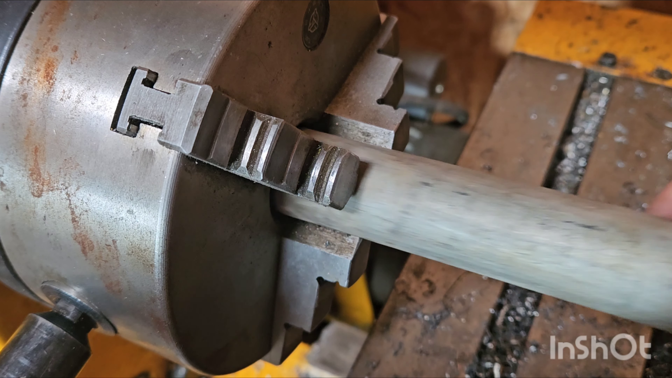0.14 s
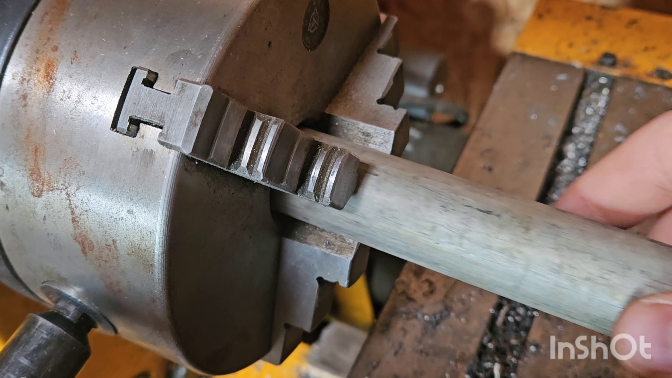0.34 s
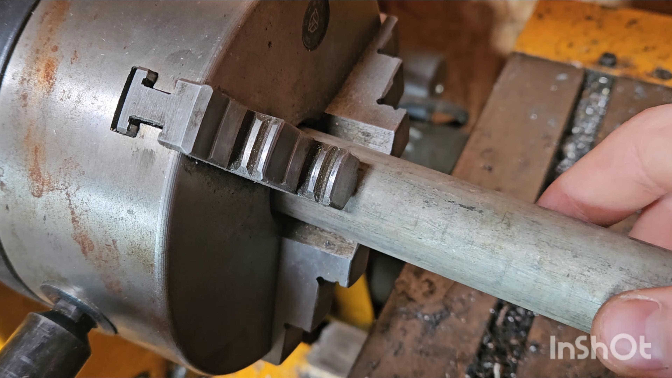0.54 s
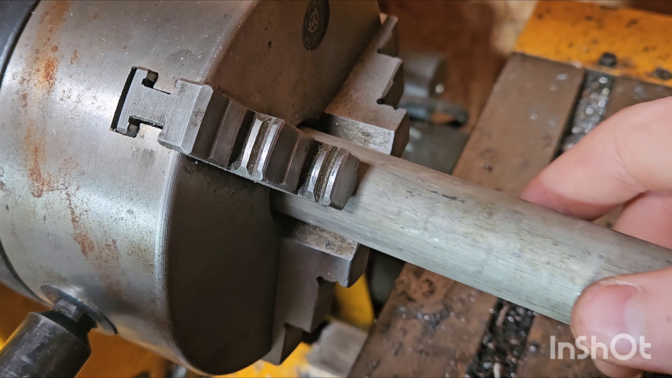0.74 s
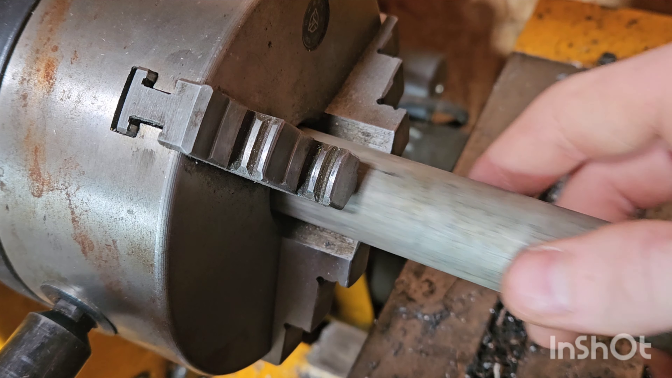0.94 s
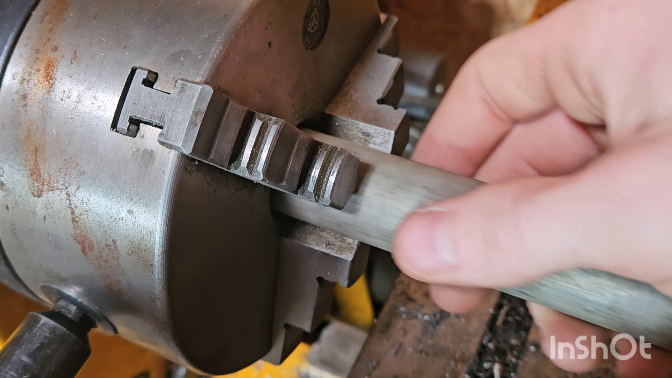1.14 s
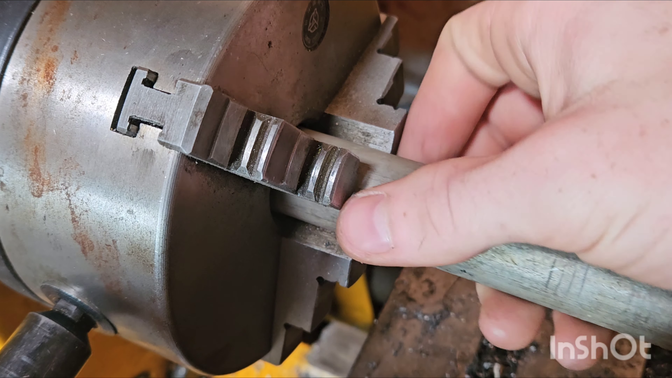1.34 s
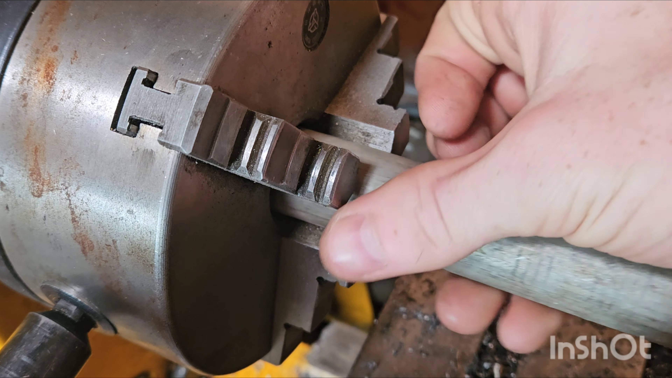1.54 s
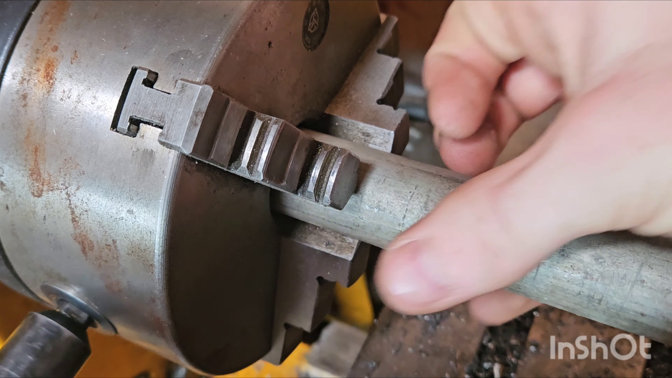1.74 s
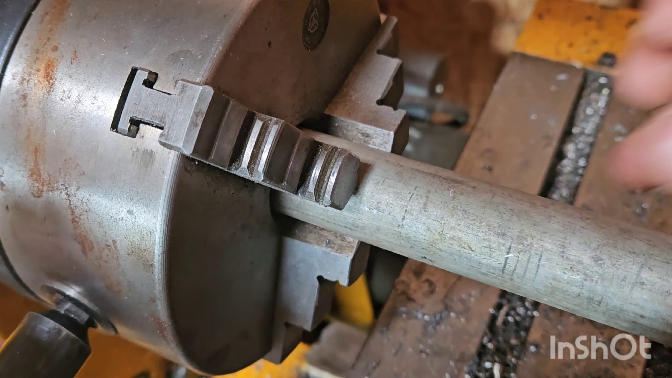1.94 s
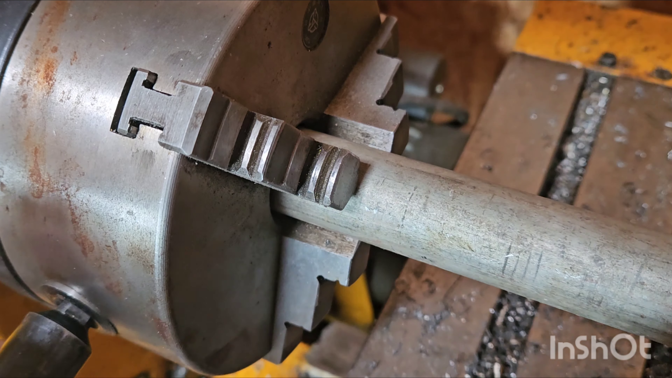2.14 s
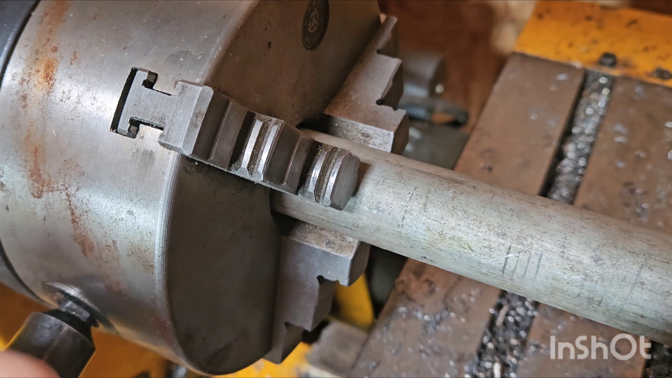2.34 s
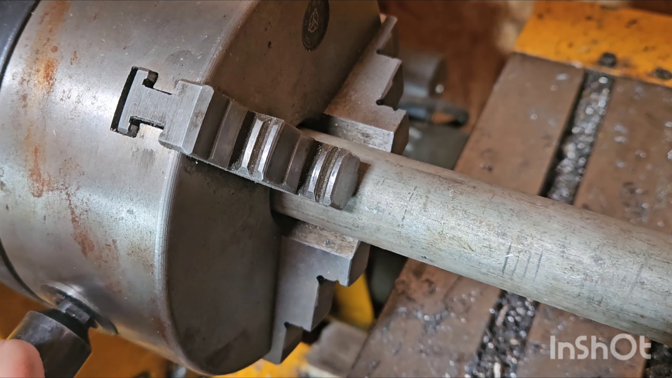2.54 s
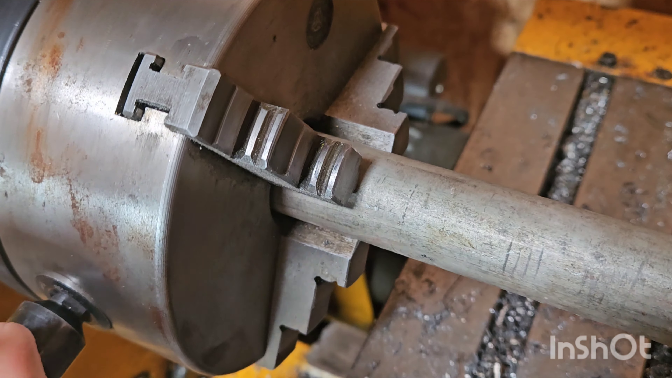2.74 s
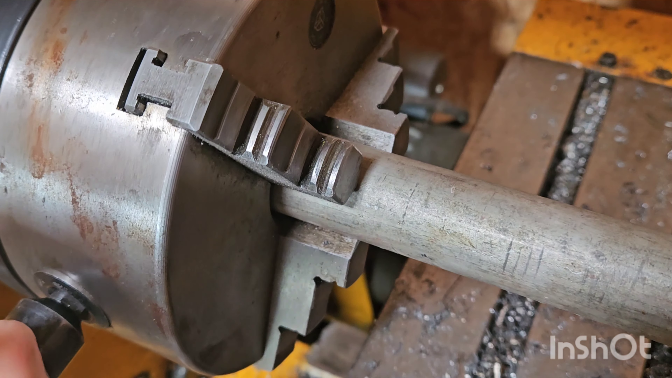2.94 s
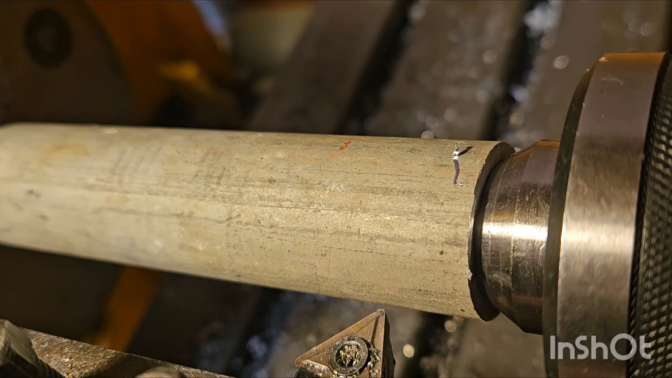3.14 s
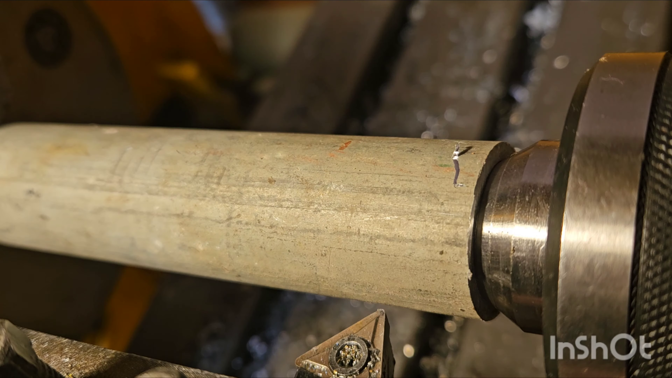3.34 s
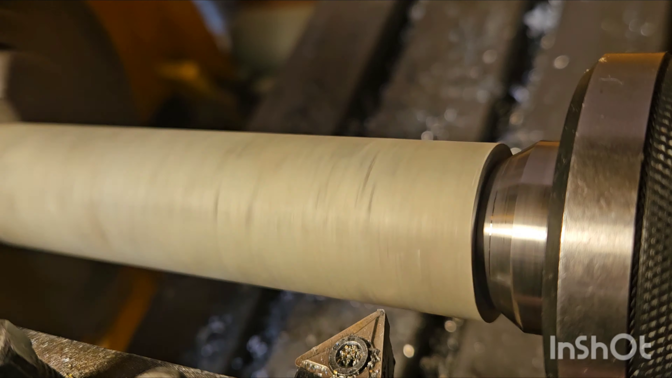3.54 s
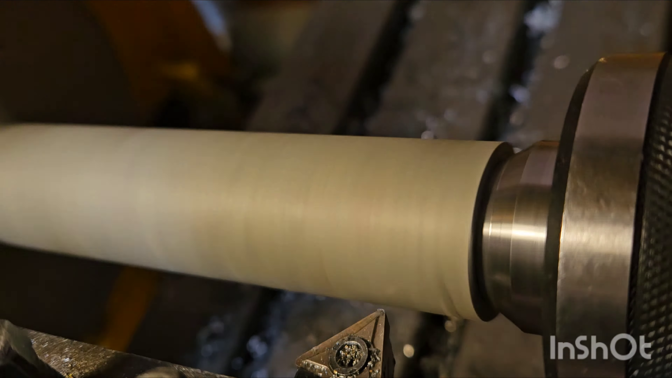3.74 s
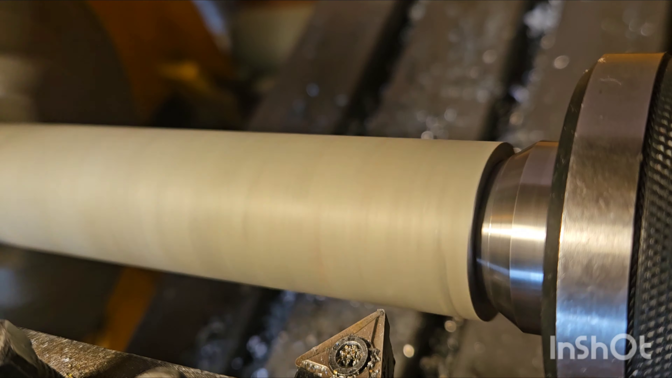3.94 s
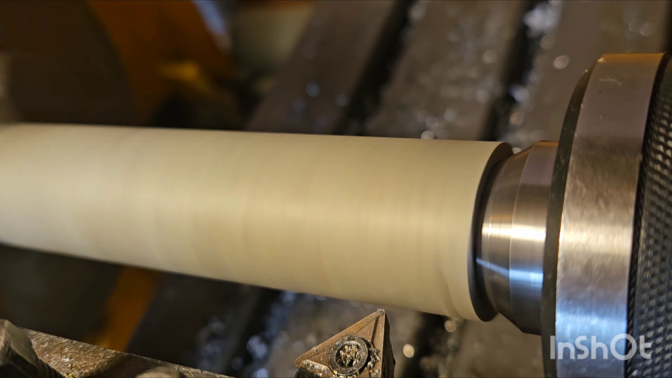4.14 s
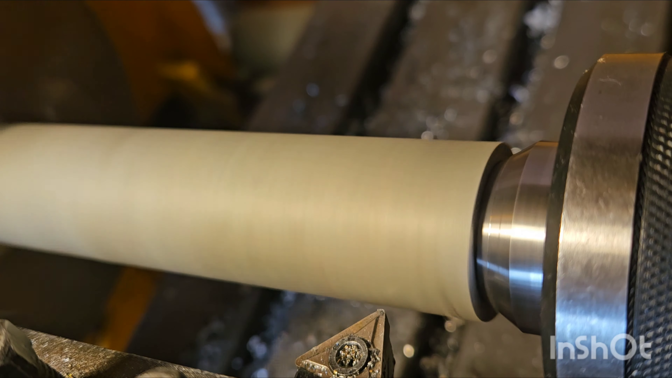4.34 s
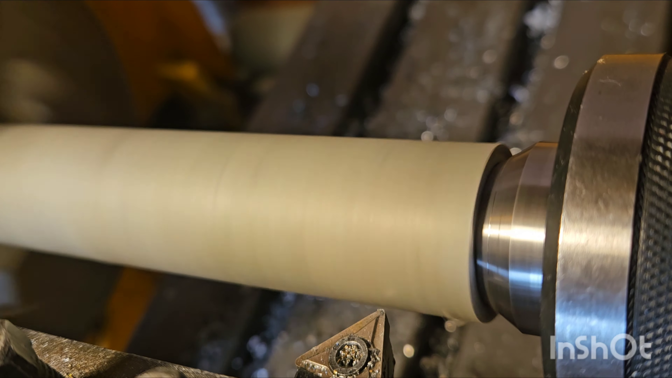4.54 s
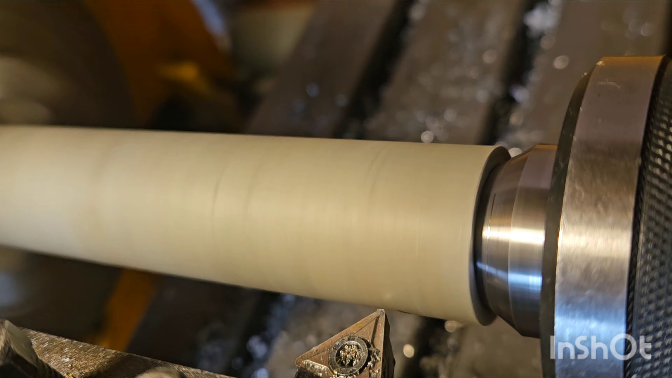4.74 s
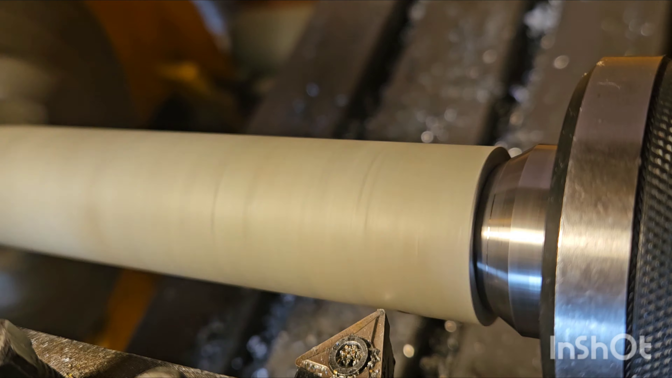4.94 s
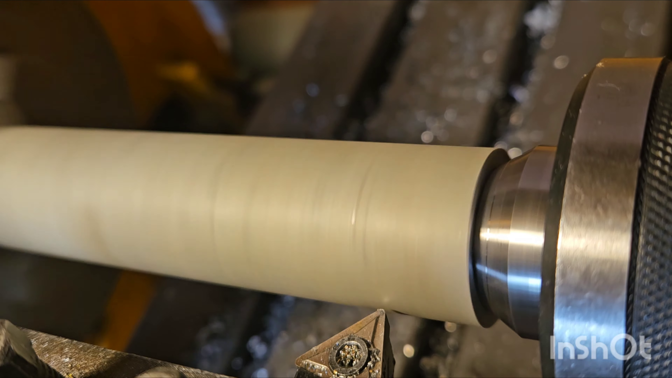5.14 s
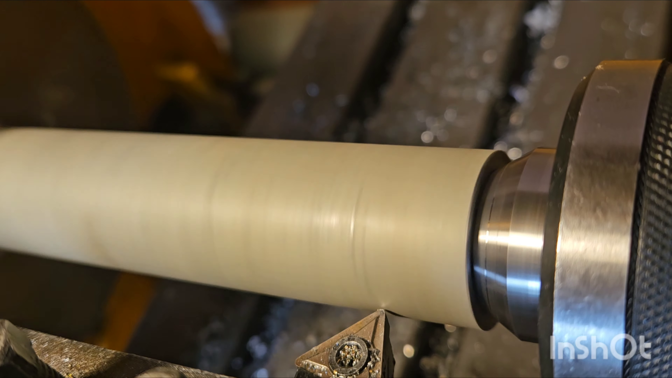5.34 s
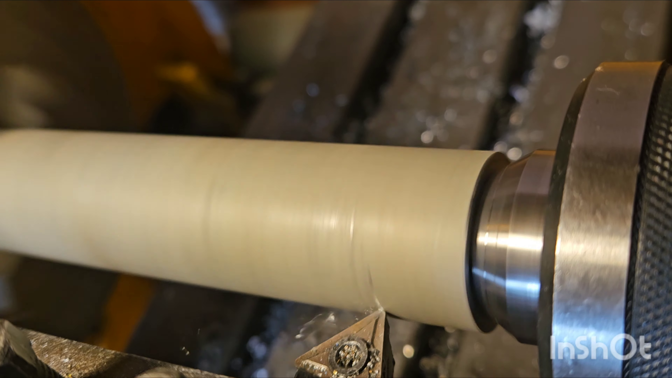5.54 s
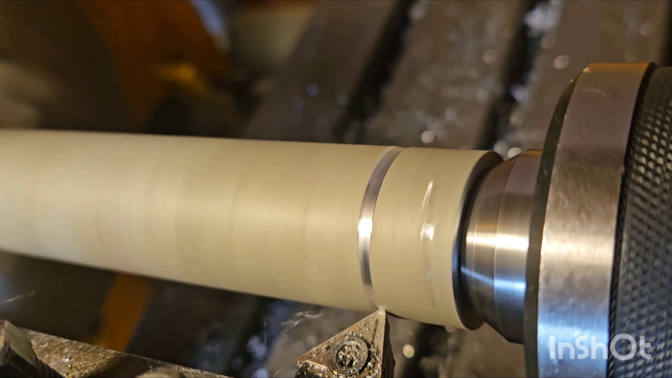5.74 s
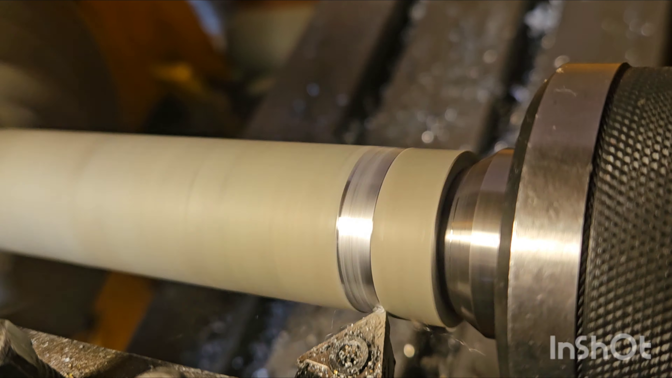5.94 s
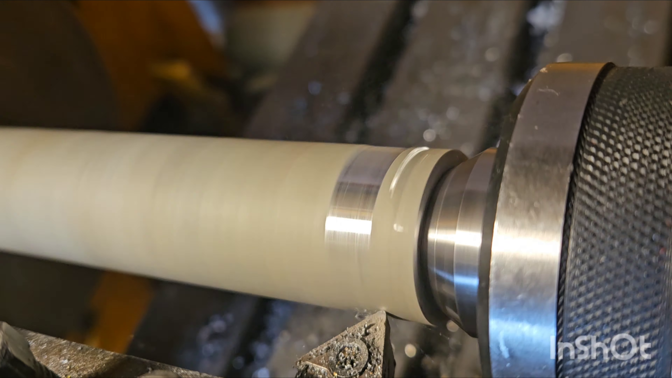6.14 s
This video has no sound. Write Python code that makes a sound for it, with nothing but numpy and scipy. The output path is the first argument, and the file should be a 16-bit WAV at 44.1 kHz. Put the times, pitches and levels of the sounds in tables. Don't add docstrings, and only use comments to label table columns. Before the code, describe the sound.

Metal rod slides and squeals faintly into a lathe chuck, knocks and key clicks follow, then a cut to a loud rattling lathe starting up and cutting.

```python
import sys
import numpy as np
from scipy import signal
from scipy.fft import rfft, irfft, next_fast_len
from scipy.io import wavfile
from scipy.ndimage import uniform_filter1d

SR = 44100
rng = np.random.default_rng(int(sys.argv[2]) if len(sys.argv) > 2 else 0)


def file_out(sig):
    cols = np.atleast_2d(sig).T
    lim = np.clip(cols, -1, 1)
    pcm = np.round(lim * 32767).astype(np.int16)
    wavfile.write(sys.argv[1], SR, pcm)


def boost(x):
    u = np.asarray(x, float) / 20
    return 10 ** u


N = 272097
M = next_fast_len(N + SR)
F = np.arange(M // 2 + 1) * SR / M + 1e-3
T = np.arange(N) / SR
PORT = np.array([[1], [-1]])
CUT_S = 3.1484
# drop/s, fade starts/s, fade ends/s
GAP_S = (5.5884, 5.602, 5.614)
# t/s, hold/s, level/dB, lean to the first mode/dB
SQUEALS = [(0, 0.23, -71, 11), (0.233, 0.021, -59.5, -4.5), (0.287, 0.0053, -62, 15.5),
           (0.3, 0.13, -75.5, 3), (.6, 0.14, -83, 4.5), (0.792, 0.17, -71.5, 8), (0.911, 0.14, -66.5, 2),
           (1.086, 0.13, -65, 11.5), (1.247, 0.057, -71.5, 8), (1.383, 0.011, -68, 9),
           (1.517, 0.064, -72, 7.5)]


def along(points, f=F):
    hz, value = np.transpose(points)
    return np.interp(np.log(f), np.log(hz), value)


def modes(table):
    return sum((-1) ** k * boost(db + PORT * pan_db / 2) * 1j * F * w / (hz ** 2 - F ** 2 + 1j * F * w)
               for k, (hz, w, db, pan_db) in enumerate(table))


def band(lo_hz, hi_hz):
    return 1 / np.sqrt((1 + (lo_hz / F) ** 8) * (1 + (F / hi_hz) ** 8))


def walk(rate):
    k = int(SR / rate)
    return uniform_filter1d(np.repeat(rng.standard_normal(N // k + 1), k), k)[:N]


def curve(s, db):
    return boost(np.interp(T, s, db, left=-200, right=-200))


def strokes(table, rise_s, fall_s):
    power = 0
    for s, hold, db in table:
        outside = np.maximum((s - T) / rise_s, (T - s - hold) / fall_s)
        power = power + boost(2 * db - 80 * np.clip(outside, 0, 5))
    return np.sqrt(power)


def tones(table, swell_db):
    rows = []
    for hz, wander, db in table:
        size = boost(db + 4.0 + swell_db * walk(wander))
        pitch = hz + 0.401 * wander * walk(3 * wander)
        rows.append(size * np.sin(2 * np.pi * np.cumsum(pitch) / SR))
    return np.array(rows)


def placed(table, swell_db):
    rows = np.array(table, float)
    tone = tones(rows[:, :3], swell_db)
    lag = rng.integers(0, 9, len(rows))
    return np.array([boost(PORT * pan / 2) * [x, np.roll(x, k)] for x, k, pan in zip(tone, lag, rows[:, 3])])


def echoes(t60_s):
    path = rng.standard_normal(SR // 2) * np.exp(-T[:SR // 2] * np.log(1000) / t60_s)
    return rfft(path / np.sqrt(np.sum(path ** 2)), M)


def excite(gain, body, lo_hz, hi_hz, grain_db=0., t60_s=0.19):
    # f/Hz, likeness/-1..1
    likeness = [(60, 0.97), (130, 0.93), (290, 0.85), (640, 0.53), (1400, .05), (3000, 0.087)]
    grain = boost(grain_db * np.minimum(rng.exponential(size=N), 5))
    near, far = rng.standard_normal((2, N)) * grain
    alike = np.clip(along(likeness), -1, 1)
    to_mid, to_side = 1 + .3 * echoes(t60_s), .7 * echoes(t60_s)
    top_hz = 15780

    def ports(g):
        source = rfft(near * g, M)
        side = to_side * source + 0.82 * rfft(far * g, M)
        pair = np.sqrt(1 + alike) * to_mid * source + PORT * np.sqrt(1 - alike) * side
        return body * (F < top_hz) * pair

    power = np.abs(ports(1).mean(axis=0)[(F > lo_hz) & (F < hi_hz)]) ** 2
    return irfft(ports(gain), M)[:, :N] / np.sqrt(2 * power.sum() / M / N)


def knocks(table, top_db, tail_db, crack_s=0.0034, tail_s=0.25, ring_db=9, pan_db=3):
    out, t = np.zeros((2, N + SR)), np.arange(SR // 3) / SR
    f = np.arange(len(t) // 2 + 1) * SR / len(t) + 1e-3
    lead = SR // 200
    for s, db, hz, body_db, edge_db in table:
        both, left, right, *tail = rng.standard_normal((5, len(t))) * np.minimum(t / 0.000097, 1)
        crack = rfft((both + 2.35 * np.array([left, right])) * np.exp(-t / crack_s))
        crack = crack * (1 + boost(ring_db) * 1j * f * 0.073 * hz / (hz ** 2 - f ** 2 + 1j * f * 0.095 * hz))
        tail = rfft(np.array(tail) * boost(tail_db) * np.exp(-t * np.log(1000) / tail_s)) / (1 + (f / 7000) ** 2)
        colour = boost(along([(300, body_db - 13.0), (1100, body_db + 10.0), (2300, 0.0031), (4500, 0.011),
                            (6500, edge_db), (9000, edge_db), (10500, top_db + 2.5),
                            (16000, top_db + 4.5), (16600, top_db - 46)], f))
        core = irfft(crack * (f > 2000) * (f < 5500), len(t))
        hit = np.roll(irfft((crack + tail) * colour, len(t)), lead, axis=1)
        i = int(s * SR)
        out[:, i - lead:i - lead + len(t)] += hit * boost(db + PORT * pan_db / 2) / np.abs(core.mean(axis=0)).max()
    return out[:, :N]


def shop_air():
    # f/Hz, level/dB per Hz
    murmur = [(88, -37), (150, 8.5), (189, -30), (225, -2), (481, -23.5), (1060, -18.5), (1220, -25.5),
              (1370, -24), (2760, -45.5), (8490, -48), (15500, -58)]
    return excite(boost(-67.5 + 1.3 * walk(3.5)), boost(along(murmur)), 284, 2000)


def still_air():
    # f/Hz, level/dB per Hz
    room = [(15, -36), (25, 5.5), (55, 5.5), (146, -6), (197, -18), (237, -13.5), (392, -25.5),
            (980, -21.5), (1150, -29.5), (6000, -58), (7800, -92), (13200, -120)]
    return excite(boost(-56 + 1.7 * walk(10)), boost(along(room)), 25, 2000)


def slow_machine():
    # t/s, rate/turns per s
    turn_rate = [(0, 11.7), (.3, 11.65), (.55, 11.95), (1.4, 11.95), (1.7, 12.05), (2.7, 12.1), (3.15, 12)]
    # multiple of the turn, level/dB
    multiples = [(6, -8), (7, -7), (8, -4), (10, -10), (11, -4), (12, -18), (13, -20), (14, -18), (15, -28)]
    turns = 2 * np.pi * np.cumsum(np.interp(T, *np.transpose(turn_rate))) / SR
    idler = 0
    for k, db in multiples:
        size = boost(-0.4 + db + 3 + 2.0 * walk(5))
        idler = idler + size * np.sin(k * turns + 7 * rng.random())
    throb = boost(2.0 + 0.6 * walk(3)) * np.sin(5 * turns)
    return throb, idler


def floor_hum():
    # f/Hz, width/Hz, level/dB, left minus right/dB
    floor = [(38.4, 24, -4.5, -5), (62, 36, -4.5, -1), (90.3, 30, -5, -8), (131.7, 27, -13.5, 1),
             (163, 18, -20.5, -6)]
    # t/s, level/dB
    swell = [
        (0, -40),
        (.2, -36),
        (.54, -42),
        (1.2, -36),
        (1.45, -35),
        (1.96, -45),
        (2.4, -40),
        (2.6, -44.5),
        (2.85, -52.5),
        (3.17, -53.5),
    ]
    # t/s, hold/s, level/dB
    lean_on_key = [
        (3.11, .06, -58),
    ]
    throb, idler = slow_machine()
    body = modes(floor).mean(axis=0) * band(25, 215)
    rumble = boost(-6.5) * excite(0.96, body, 90, 177, t60_s=0.009) + idler
    heave = boost(-42 - 2.5 * T + 0.9 * walk(7.1)) + strokes(lean_on_key, 0.36, .1)
    return heave * rumble + curve(*np.transpose(swell)) * throb


def far_motor():
    # t/s, f/Hz, level/dB
    spin_up = [
        (2.6, 52, -55),
        (2.68, 58, -41),
        (2.76, 63, -52),
        (2.9, 65, -48),
        (2.96, 66.5, -36),
        (3.03, 71, -42),
        (3.08, 73, -38),
        (3.15, 77, -34),
    ]
    s, hz, db = np.transpose(spin_up)
    phase = 2 * np.pi * np.cumsum(np.interp(T, s, hz)) / SR
    return -np.sqrt(2) * curve(s, db) * np.cos(phase - phase[int(CUT_S * SR)])


def hand():
    # t/s, hold/s, level/dB
    brushes = [
        (.23, 0.11, -85),
        (.448, .004, -82),
        (.8, 0.35, -97),
        (1.06, 0.2, -77),
        (1.345, 0.043, -70),
        (1.5, 0.24, -84),
        (2.27, 0.028, -63.5),
        (2.32, 0.097, -74.5),
        (2.52, .02, -71),
        (2.955, 0.11, -73),
    ]
    # f/Hz, level/dB per Hz
    rustle = [(3000, -14), (5500, -4.5), (8500, 3), (10000, -1), (12000, 3), (16000, 6)]
    return excite(strokes(brushes, 0.055, 0.1), boost(along(rustle)), 7460, 14200, grain_db=5.5, t60_s=0.044)


def squeal_gain(lean, rise_s, fall_s):
    return strokes([(s, hold, db + lean * d) for s, hold, db, d in SQUEALS], rise_s, fall_s)


def sliding_rod():
    # t/s, push/dB
    shoves = [
        [(0, -46.5), (.31, -47.5), (.54, -64), (.59, -66)],
        [(.61, -60.5), (.86, -51.5), (1.2, -43.5), (1.36, -52), (1.41, -47.5), (1.51, -57), (1.62, -47),
         (1.66, -58)],
        [(1.8, -54.5), (1.96, -60), (2.08, -80)],
    ]
    # t/s, hold/s, level/dB
    thuds = [
        (2.245, 0.011, -38),
        (2.47, .03, -48.5),
        (2.515, 0.012, -42),
        (2.96, .02, -57.5),
        (3.03, 0.021, -54),
    ]
    # f/Hz, width/Hz, level/dB, left minus right/dB
    hollow = [(250.5, 6.1, -2, -1), (333, 39, -1.5, 0.94), (375, 61, -3, -0.84), (410, 18.8, 2.5, 1),
              (467, 35, -7.5, 0)]
    # f/Hz, level/dB per Hz
    scrape_colour = [(290, -22), (500, 3), (1930, -13), (2460, -13), (2730, -18), (5310, -32), (6140, -21),
                     (7640, -69), (10400, -28), (16000, -25)]
    # f/Hz, width/Hz, level/dB, left minus right/dB
    rod_low = [(2490, 60, 3, 3.1), (2900, 500, -13, 4.5), (4100, 200, -19, 0), (4900, 300, -19, -1)]
    rod_mid = [(6140, 35, 0, 3.5)]
    rod_top = [(8610, 200, -18, 1), (10700, 40, 0, 2), (12520, 45, -1, 0), (13900, 70, -9, 0),
               (15400, 100, -13, 0)]
    slip = boost(3.0 * walk(35))
    push, jaws = curve(*np.vstack(shoves).T), strokes(thuds, .03, .27)
    thud_body = band(243, 400) ** 2 + boost(-29.0) * band(460, 1796)
    thud = excite(jaws, thud_body, 200, 560, t60_s=0.033)
    boom = excite(push * boost(2.0 * walk(29.4)), modes(hollow) * band(217, 660), 220, 520, t60_s=0.043)
    rest = boost(-64.5)
    rub = boost(-80.5) * ((push + jaws + rest) / boost(-48)) ** 0.78
    scrape_body = boost(along(scrape_colour)) * band(400, 7600)
    scrape = excite(rub * np.sqrt(slip), scrape_body, 2850, 7200, grain_db=2.0)
    low, mid, top = [squeal_gain(lean, 0.02, 0.073) for lean in (1, -0.49, 0)]
    rod = boost(-4.0) * excite(low * np.sqrt(slip), modes(rod_low) * band(1300, 4400), 2380, 2680)
    rod += boost(-3.5) * excite(mid * slip, modes(rod_mid) * band(4800, 5800) * boost(-6.0), 6146.4, 6206)
    rod += excite(top * boost(-9.5) * slip, modes(rod_top) * band(12000, 17000), 10550, 10850)
    return thud + boom + scrape + rod


def rod_partials():
    # f/Hz, wander/Hz, level/dB, left minus right/dB
    partials = [(2450, 24, -7.5, -3), (3350, 33, -18, 9), (6140, 50, -9.5, 3), (10660, 52, -13, -9),
                (12550, 70, -11, -8), (14200, 80, -10, -2)]
    leans = [0.71, 0.021, -1.3, -0.36, 0.17, 0]
    return sum(x * squeal_gain(lean, 0.08, 0.14) for x, lean in zip(placed(partials, swell_db=6.5), leans))


def key():
    # t/s, hold/s, level/dB
    grind = [
        (1.64, .05, -78),
        (1.77, 0.055, -71),
        (1.87, .03, -74),
        (1.92, 0.028, -71),
        (1.99, 0.018, -81),
    ]
    # t/s, level/dB
    squeak = [
        (2.6, -105),
        (2.9, -94),
        (2.99, -90),
        (3.01, -79),
        (3.15, -83),
    ]
    # t/s, hold/s, level/dB, f/Hz
    pings = [(.093, .012, -62, 3100), (.094, .01, -63, 4200), (.151, .012, -63, 3100),
             (.194, .012, -64, 3050), (1.27, .05, -82, 3350), (1.69, .045, -80, 6150),
             (2.02, .06, -87, 3320), (2.232, .03, -70, 5100), (2.452, .01, -75, 3600),
             (2.475, .04, -64, 1550), (2.575, .03, -89, 6300), (2.58, .015, -74, 2300),
             (2.61, .02, -81, 2950), (2.66, .04, -87, 2950), (2.68, .05, -92, 5650),
             (2.95, .008, -82, 3800), (3.025, .008, -86, 4400)]
    # t/s, peak/dB, ring/Hz, body/dB, edge/dB
    fumbles = [(.141, -55, 3100, -10, -35), (.16, -55, 3100, -10, -35), (1.433, -70, 2500, -7, -30),
               (1.708, -68, 2000, -4, -30), (1.81, -62, 3100, -10, -30), (1.943, -59.5, 3000, 5, -25),
               (2.398, -58, 5200, -10, -8), (2.579, -63, 2280, 6, -30), (2.6353, -63, 3100, -8, -30),
               (2.6678, -68, 1540, 13, -30), (3.027, -68, 1100, 8, -30)]
    out = excite(strokes(grind, .03, 0.1), band(1200, 5400), 1200, 5600, grain_db=3.5, t60_s=0.06)
    out += curve(*np.transpose(squeak)) * np.sin(2 * np.pi * 3335 * T + 0.99 * walk(40))
    rings = placed([(hz, 90, db, 0) for s, hold, db, hz in pings], swell_db=4)
    for x, (s, hold, db, hz) in zip(rings, pings):
        out += x * strokes([(s, hold, 0)], 0.013, 0.033)
    return out + knocks(fumbles, top_db=-30, tail_db=-6)


def taps():
    # t/s, peak/dB, ring/Hz, body/dB, edge/dB
    dull = [(.0927, -42.5, 4250, -10, -35), (.1274, -48, 2520, -7, -30), (.1504, -43.5, 3080, -6, -38),
            (.1935, -44, 3050, -8, -33), (.2839, -40.5, 2850, 8.5, -50), (.448, -56, 2280, 8, -30),
            (1.3892, -59, 2550, -4, -30), (1.6225, -31, 4900, -12, -6.5), (1.7595, -47.5, 3190, -3, -25),
            (1.7875, -45, 3040, 3, -12), (1.8397, -48.5, 3920, 1, -22), (1.8706, -50.5, 3160, 3, -27),
            (1.9157, -44, 3550, -5, -13), (1.9859, -49, 3220, -17, -11), (2.2292, -42, 3140, -7, -8.5),
            (2.2712, -35, 3270, -15, -9), (2.356, -49, 3300, -25, 5), (2.4688, -31, 3660, -9.5, -6),
            (2.9282, -56, 3080, -3, -36)]
    # t/s, peak/dB, ring/Hz, body/dB, edge/dB
    snaps = [
        (2.3007, -28.5, 5200, -26.5, -0.42),
        (2.5145, -38, 4530, 2, 0.1),
    ]
    return knocks(dull, top_db=-30, tail_db=-6.5) + knocks(snaps, top_db=-1.5, tail_db=-12)


def chucking():
    return shop_air() + floor_hum() + far_motor() + hand() + sliding_rod() + rod_partials() + key() + taps()


def start_up(engage_s):
    # t/s, level/dB
    moan = [
        (3.385, -78),
        (3.4, -45),
        (3.47, -38.5),
        (3.6, -38),
        (3.65, -38),
        (3.75, -34),
        (3.8, -64),
        (3.9, -73),
    ]
    # f/Hz, width/Hz, level/dB, left minus right/dB
    winding_modes = [(507, 67, 18, 0), (158, 15, 5, 0)]
    # f/Hz, wander/Hz, level/dB
    core = (515, 14, -3)
    # t/s, level/dB
    squeal = [
        (3.69, -60),
        (3.703, -31),
        (3.716, -20),
        (3.728, -84),
    ]
    # t/s, peak/dB, ring/Hz, body/dB, edge/dB
    clunks = [
        (3.401, -38.5, 4100, -25, -1),
        (3.4444, -32.5, 2010, -3, -25),
        (3.472, -24.5, 4500, -14, -1.5),
        (3.749, -18, 2050, -31, -8),
        (5.339, -32, 2610, -20, -5),
        (6.1094, -22, 4760, 0, -25),
    ]
    # t/s, peak/dB, ring/Hz, body/dB, edge/dB
    bite = [
        (3.652, -29, 4740, 1, 7.2),
    ]
    current = curve(*np.transpose(moan))
    out = excite(current, modes(winding_modes) * band(130, 560), 100, 700, t60_s=0.0083)
    out += current * (T < engage_s) * tones([core], swell_db=3.5)[0]
    out += curve(*np.transpose(squeal)) * np.sin(2 * np.pi * 1525 * T + 1.1 * walk(95))
    out += knocks(clunks, top_db=-49, crack_s=0.013, tail_s=0.22, tail_db=-33, ring_db=8.5, pan_db=0.0)
    return out + knocks(bite, top_db=2.0, tail_db=-25, crack_s=0.016)


def whine(speed):
    # f/Hz, wander/Hz, level/dB
    whines = [(116, 5.4, -50), (239.5, 2.2, -41.5), (612, 4, -42)]
    rows = tones(whines, swell_db=1.5) * speed
    rows[:2] *= np.where(T > GAP_S[1], boost(-5), 1)
    return rows.sum(axis=0)


def meshing():
    # f/Hz, wander/Hz, level/dB, left minus right/dB
    mesh = [(748, 12, -54, 3), (846, 14, -50, -2), (1124, 24, -55, 2), (1497, 30, -55, 0),
            (1701, 22, -55, 2), (2279, 18, -51, -6), (2617, 16, -53, -9), (2798, 14, -46.5, 8),
            (2890, 20, -46.5, 4), (3617, 25, -54, 4), (4868, 40, -53, -8)]
    # f/Hz, wander/Hz, level/dB, left minus right/dB
    late_tones = [(266, 12, -49, 0), (302, 10, -49, 0), (808, 12, -52, 0), (4640, 25, -53, -5)]
    # t/s, hold/s, level/dB
    bumps = [
        (3.92, .02, -49),
        (5.53, 0.025, -48),
        (5.67, 0.15, -42.5),
        (6.04, .03, -49),
        (6.13, .04, -38),
    ]
    speed = np.clip((T - 3.7) / 0.16, 0, 1)
    out = excite(strokes(bumps, 0.035, 0.073), band(30, 106), 25, 140, t60_s=0.04)
    out += speed * placed(mesh, swell_db=5.0).sum(axis=0)
    return out + (T > GAP_S[1]) * placed(late_tones, swell_db=4.5).sum(axis=0)


def tool_tip(touch):
    # f/Hz, width/Hz, level/dB, left minus right/dB
    tip_modes = [(10900, 400, -13.5, -3), (12880, 150, 1.5, -3.5), (14750, 250, -6, -4),
                 (15600, 300, -22, 0)]
    # t/s, hold/s, level/dB
    catches = [
        (5.485, .004, -50),
        (5.54, .004, -41),
        (5.575, 0.012, -43),
        (5.645, 0.01, -43),
        (5.976, .008, -41),
        (6.06, .008, -43),
    ]
    # t/s, hold/s, level of the part removed/dB
    skips = [
        (5.72, .02, -23),
        (5.83, .05, -21),
        (6.03, 0.015, -20),
    ]
    contact = 1 - np.minimum(strokes(skips, .1, 0.081), .9)
    cut = boost(-44.5) * touch * contact + strokes(catches, 0.029, 0.011)
    return excite(cut * boost(2.6 * walk(76)), modes(tip_modes) * band(9500, 17000), 12560, 14000,
                  grain_db=-0.5, t60_s=.1)


def lathe():
    # f/Hz, width/Hz, level/dB, left minus right/dB
    housing_modes = [(132, 25, -41.5, 1), (245, 16, -44, -5), (302, 18, -41.5, -0.5), (557, 19, -39, 2),
                     (620, 17, -36.5, -9.5), (851, 43, -38.5, 0.5), (1118, 28, -41, 4), (1489, 19.5, -38.5, 3),
                     (1890, 8.7, -47, 1), (2250, 25, -43.5, -1), (2700, 14, -46, -19), (2797, 25, -40, 3.5),
                     (2935, 56, -44.5, 3), (3620, 75, -50, 7), (4530, 77, -47.5, -11), (4848, 127, -44.5, -11),
                     (8570, 36, -54.5, -8),
                     (2855, 125, -45.5, 7), (477, 6.2, -39, -4), (765, 22, -46.5, 21),
                   (1305.6, 8.4, -46, -17), (1696, 32, -42, 5.5), (2030, 23, -57, 10), (1950, 22, -46, 13),
                   (2520, 26, -59, -5), (4136, 250, -49.5, -3), (5330, 110, -57.5, 13), (6440, 12, -67, -3),
                   (6070, 45, -68, -9)]
    # f/Hz, level/dB per Hz
    rattle_colour = [(18, -44), (30, -3), (124, -4), (184, -3.5), (245, -4.5), (426, -2), (600, 3),
                     (1220, -8.5), (1460, -5), (2830, -1), (3400, -6), (4780, -12), (5590, -15.5),
                     (8520, -17), (16000, -32)]
    # f/Hz, left minus right/dB
    rattle_pan = [(60, 0), (700, 0), (2400, 0), (5200, 3.5), (6500, 4.5), (8200, -1.5), (9300, 12),
                  (10000, 2), (15000, -4)]
    # t/s, level/dB
    free_spin = [
        (3.39, -53.5),
        (3.43, -44),
        (3.48, -33),
        (3.51, -39.5),
        (3.57, -42),
        (3.63, -52),
        (3.645, -61),
    ]
    # t/s, hold/s, level/dB
    starter = [
        (3.4, 0.1, -43),
    ]
    # t/s, hold/s, level/dB
    jolts = [
        (3.396, 0.014, -52.5),
        (3.475, 0.0073, -47.5),
        (3.65, 0.0094, -43.5),
    ]
    # t/s, hold/s, level/dB
    surges = [
        (3.75, 0.011, -28),
        (5.56, 0.025, -31),
    ]
    # t/s, peak/dB
    ticks = [(3.976, -29), (4.1221, -23), (4.1934, -24), (4.2423, -37), (4.2887, -30), (4.38, -40),
             (4.4943, -31), (4.5152, -30), (4.573, -28), (4.6519, -31), (4.7686, -29), (4.7971, -40),
             (4.822, -32), (4.8694, -28), (4.9138, -30), (4.9552, -34), (5.05, -23.5), (5.1413, -24),
             (5.2361, -31), (5.3326, -21), (5.3932, -31), (5.442, -24), (5.5079, -28)]
    engage_s, touch_s, mesh_hz = 3.65, 5.73, 43.7
    driven = T > engage_s
    rattle = driven * boost(-13 * np.clip(1 - (T - engage_s) / 0.096, 0, 1))
    speed = np.clip((T - 3.68) / 0.13, 0, 1)
    touch = boost(-45 * np.clip(touch_s - T, 0, 1))
    turn = np.cos(2 * np.pi * mesh_hz * T + .5 * walk(2.83))
    idle = curve(*np.transpose(free_spin))
    jolt, surge = strokes(jolts, 0.016, 0.016), strokes(surges, 0.13, 0.07)
    slap = strokes([(s, .002, db - 19) for s, db in ticks], 0.0019, 0.021)
    plain = boost(along(rattle_colour) + PORT * along(rattle_pan) / 2)
    body = np.hypot(plain, boost(43.5) * np.abs(modes(housing_modes)))

    shaking = (boost(-35) * driven + strokes(starter, .02, 0.11)) * boost(1.0 * walk(12))
    bed = excite(shaking, body * band(51, 457), 53, 530, t60_s=0.099)
    thump = strokes(jolts, 0.016, 0.14) * (np.abs(T - jolts[1][0]) > .05)
    bed += excite(boost(9.5) * thump, band(127, 126), 100, 220, t60_s=0.12)

    ringing = np.hypot(boost(-35.5) * driven + idle, surge) * boost(0.56 * walk(14))
    head = excite(ringing, body * band(476, 1130), 380, 1280, t60_s=0.17)

    teeth = boost(-28.5) * rattle + boost(-27) * np.sqrt(idle) + boost(-3.5) * jolt
    gear = excite(teeth * np.sqrt(1 - speed), (plain + 0.057 * body) * band(1100, 7500), 1300, 5500,
                  grain_db=4.5, t60_s=0.083)
    beating = (teeth + 0.95 * slap) * np.sqrt(speed) * boost(1.14 * turn + 0.74 * walk(25.03))
    gear += excite(beating, body * band(1165, 5500), 1100, 6200, grain_db=2.5, t60_s=0.077)

    hiss = boost(-41 + 3 * touch) * rattle + boost(-36.5) * np.sqrt(idle) + jolt + slap
    hiss = hiss * boost(1.76 * turn + 1.35 * walk(60))
    air = excite(hiss, body * band(5540, 17000), 6450, 12700, grain_db=1.5, t60_s=0.081)
    air += excite(boost(6.5) * slap, band(3900, 5300), 5300, 8000, grain_db=2.5, t60_s=0.03)
    return bed + head + gear + air + whine(speed) + start_up(engage_s) + tool_tip(touch)


def scene():
    start_s = 3.384
    running = np.clip((T - start_s) / .01, 0, 1)
    return np.where(T < CUT_S, chucking(), still_air() + lathe() * running + meshing())


def roll_off(x):
    return signal.sosfilt(signal.butter(12, 16100, fs=SR, output="sos"), x)


def record(dry):
    # f/Hz, width/Hz, level of the part removed/dB
    port_dips = [(9750, 800, -3.5), (13800, 800, -1.5)]
    notches = [1 - modes([(hz, w, min(db, -.5), 0)]) for hz, w, db in port_dips]
    heard = rfft(dry, M) * np.prod(notches, axis=0)
    drop, start, end = GAP_S
    open_ = np.where(T < drop, 1, np.clip((T - start) / (end - start), 0, 1) ** 1.5)
    remnant = irfft(heard * (boost(-21) * band(900, 4300) ** 2 + boost(-48)), M)[:, :N]
    mix = irfft(heard, M)[:, :N] * open_ + remnant * (1 - open_)
    return roll_off(mix)


dry = scene()
out = record(dry)
file_out(out)
```